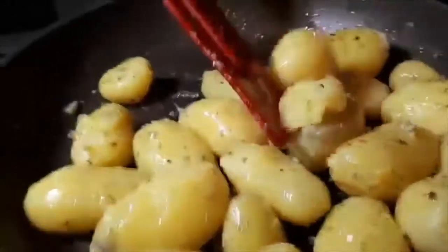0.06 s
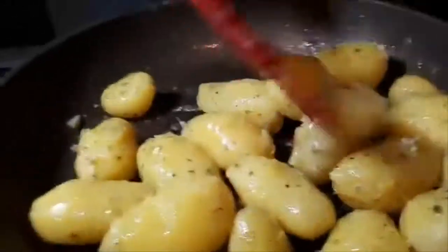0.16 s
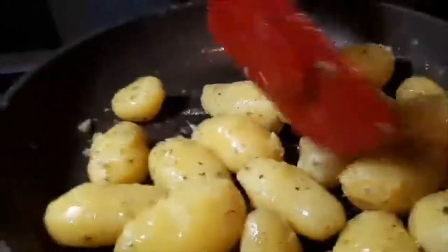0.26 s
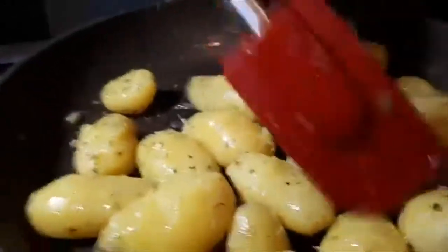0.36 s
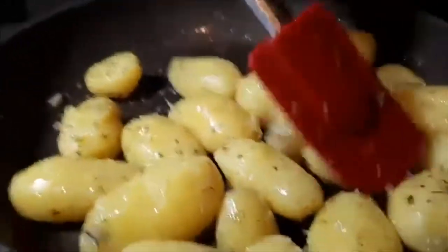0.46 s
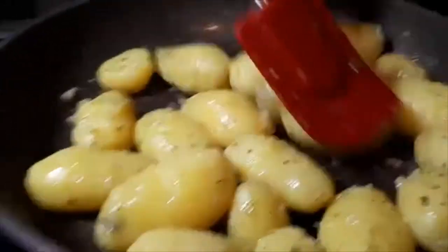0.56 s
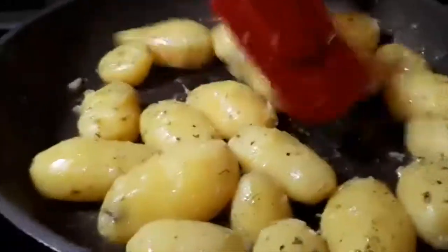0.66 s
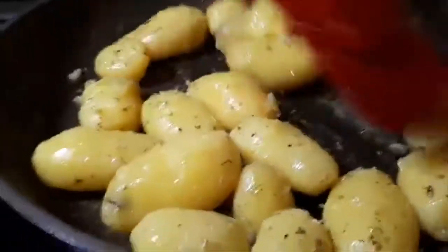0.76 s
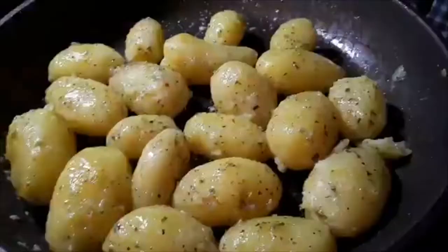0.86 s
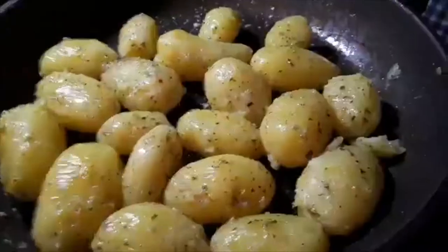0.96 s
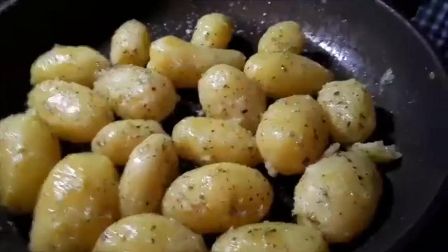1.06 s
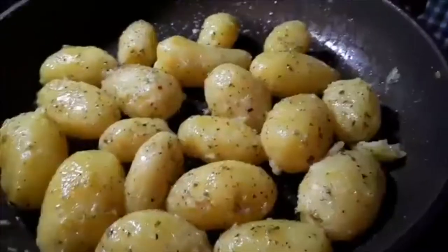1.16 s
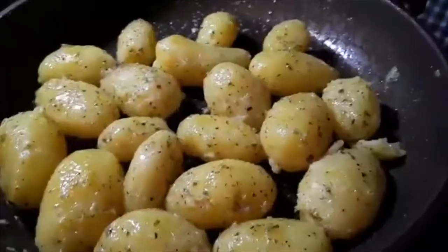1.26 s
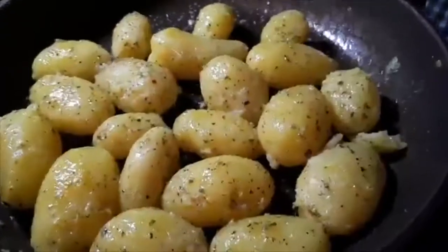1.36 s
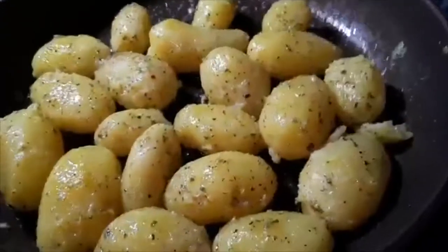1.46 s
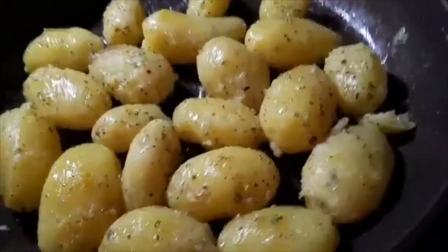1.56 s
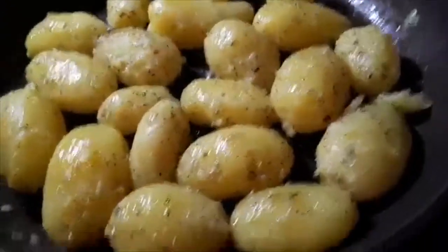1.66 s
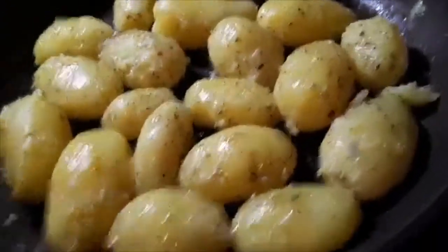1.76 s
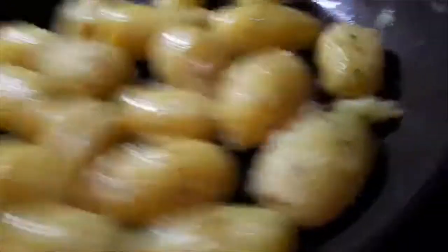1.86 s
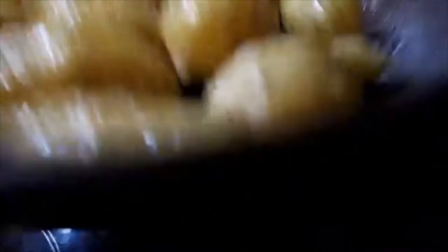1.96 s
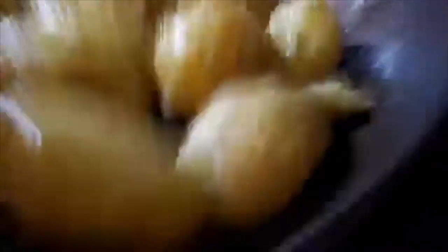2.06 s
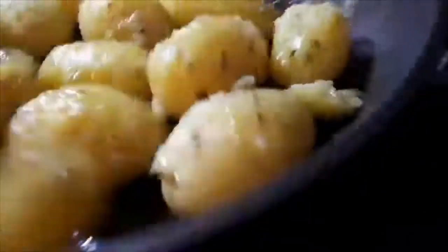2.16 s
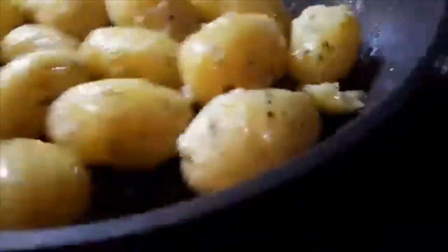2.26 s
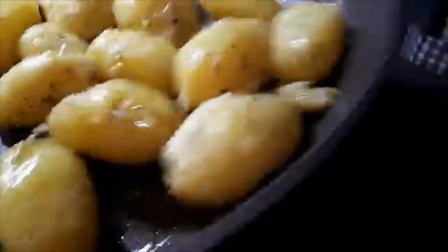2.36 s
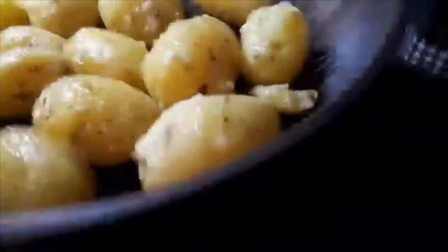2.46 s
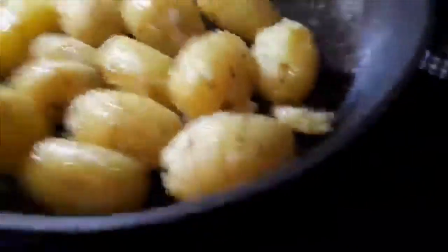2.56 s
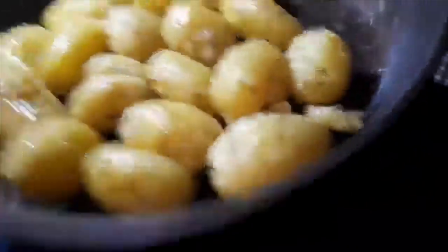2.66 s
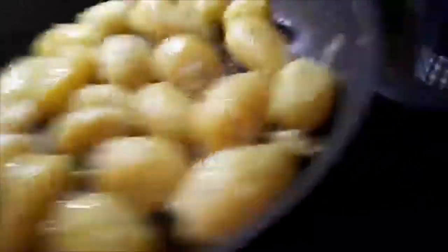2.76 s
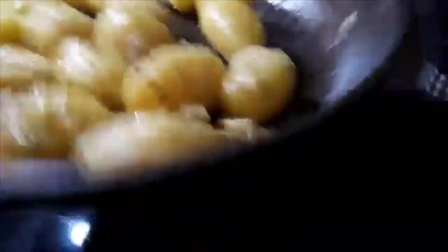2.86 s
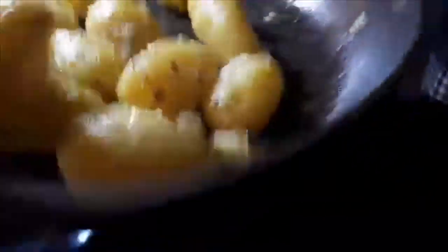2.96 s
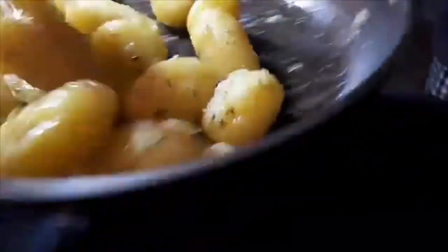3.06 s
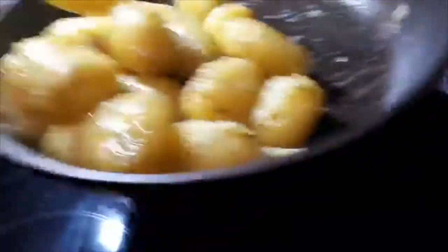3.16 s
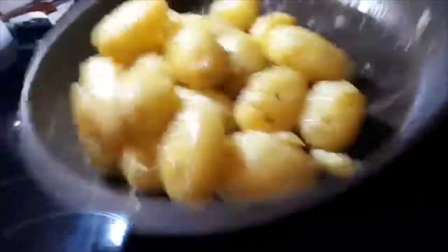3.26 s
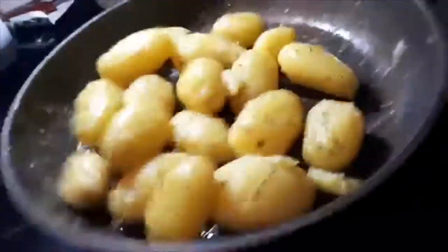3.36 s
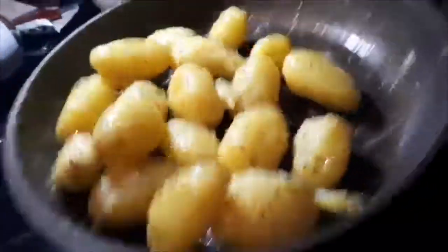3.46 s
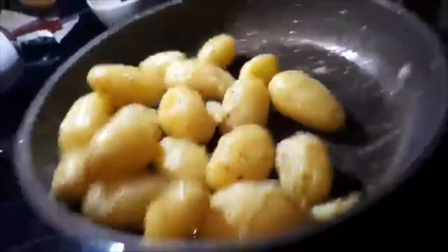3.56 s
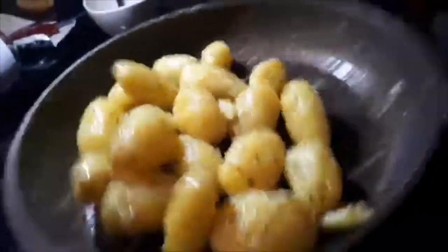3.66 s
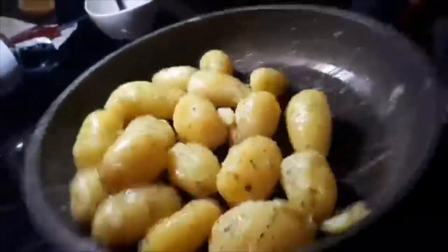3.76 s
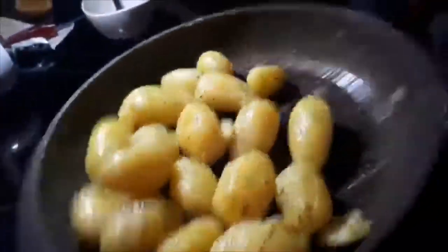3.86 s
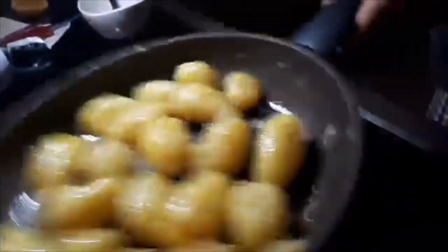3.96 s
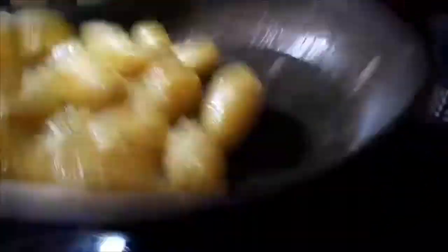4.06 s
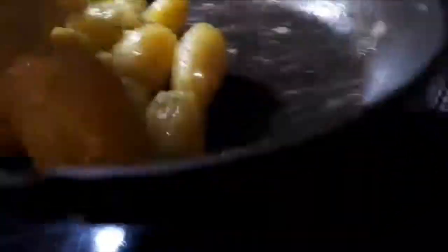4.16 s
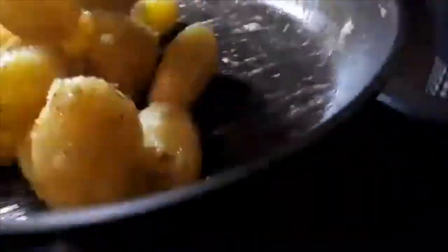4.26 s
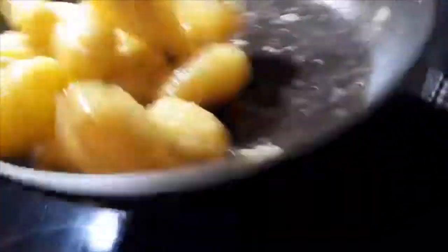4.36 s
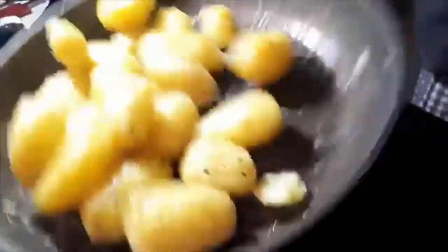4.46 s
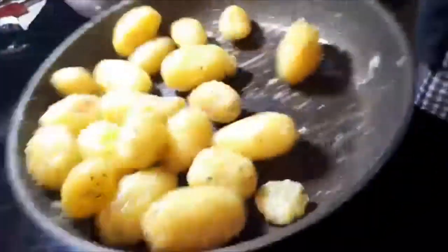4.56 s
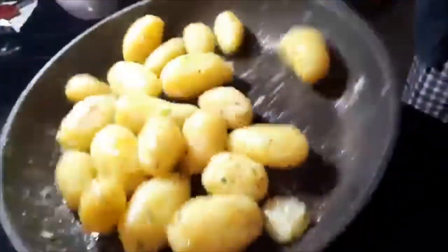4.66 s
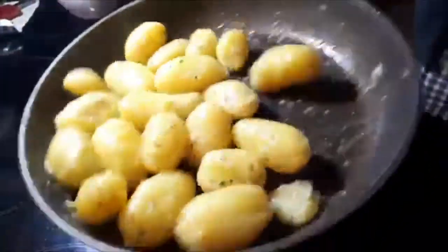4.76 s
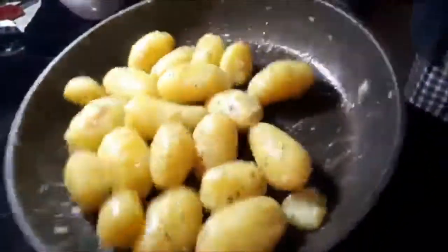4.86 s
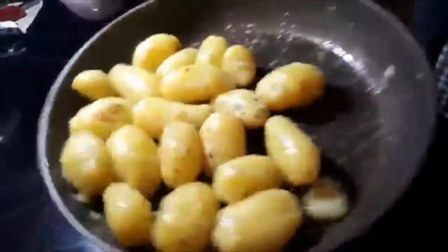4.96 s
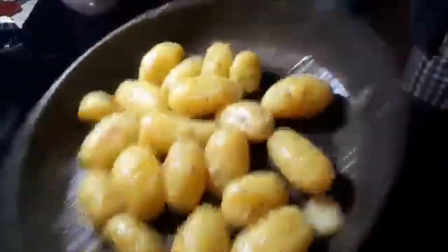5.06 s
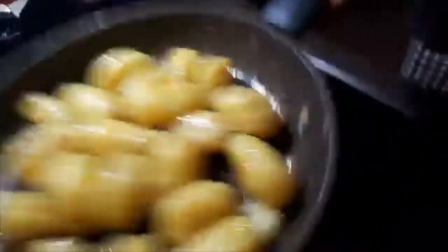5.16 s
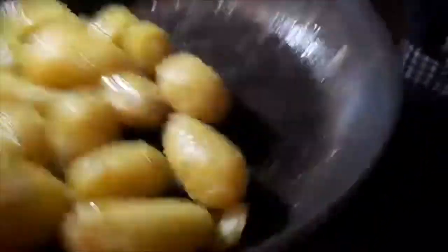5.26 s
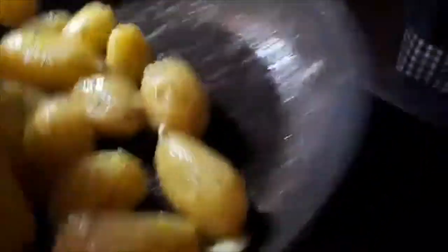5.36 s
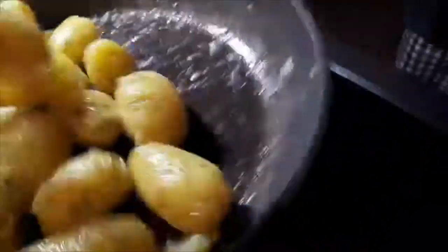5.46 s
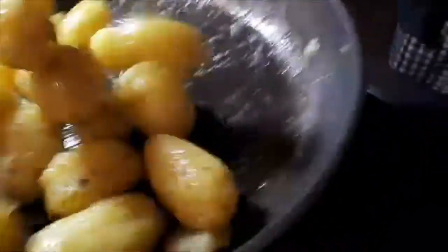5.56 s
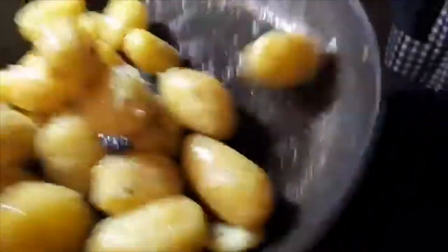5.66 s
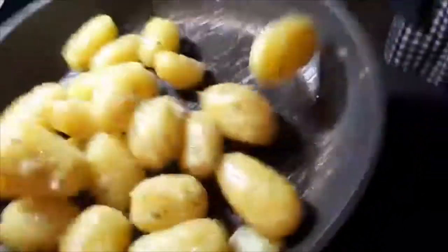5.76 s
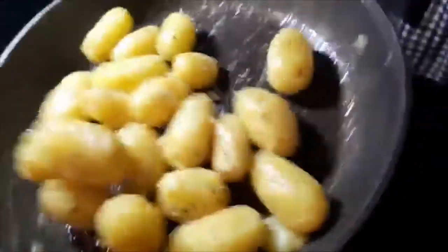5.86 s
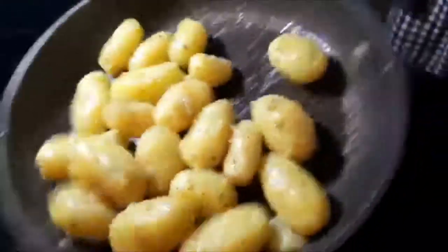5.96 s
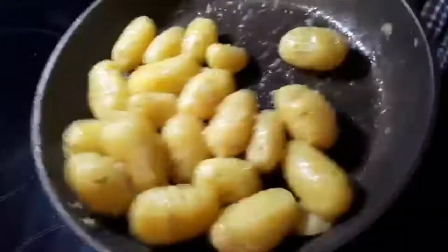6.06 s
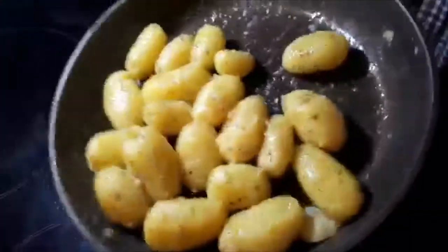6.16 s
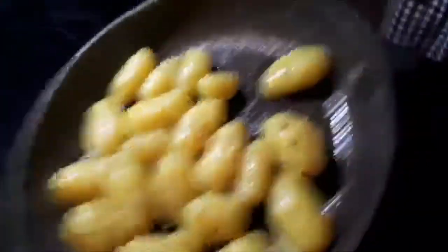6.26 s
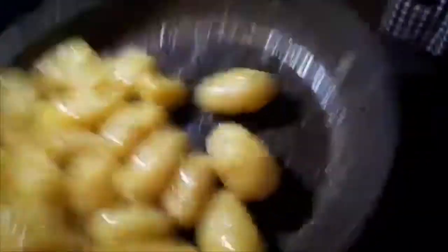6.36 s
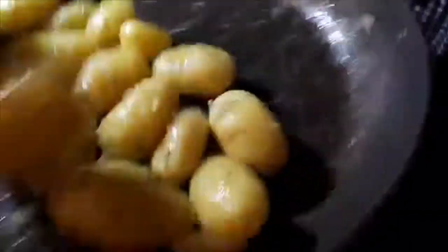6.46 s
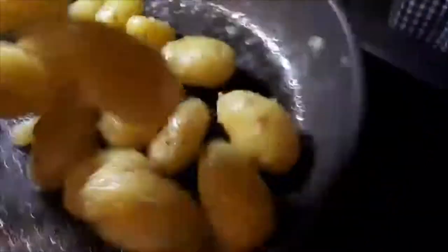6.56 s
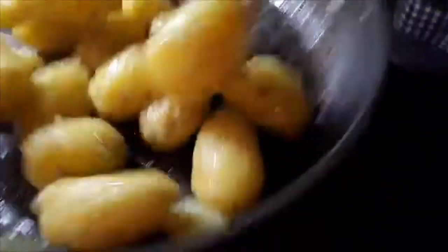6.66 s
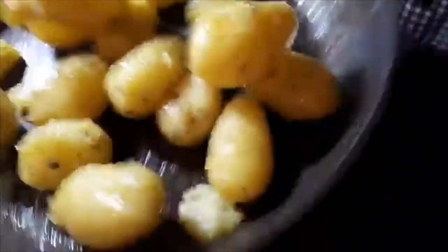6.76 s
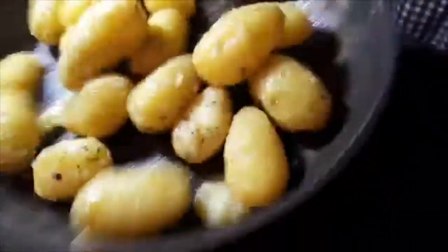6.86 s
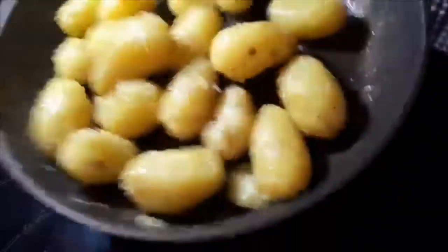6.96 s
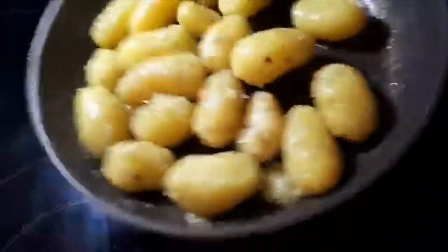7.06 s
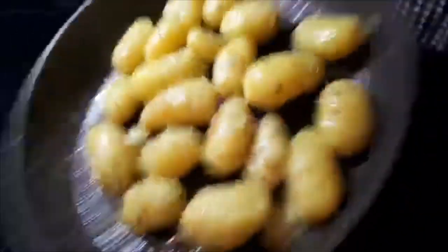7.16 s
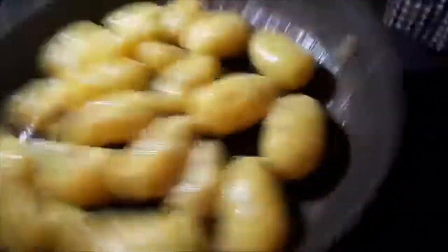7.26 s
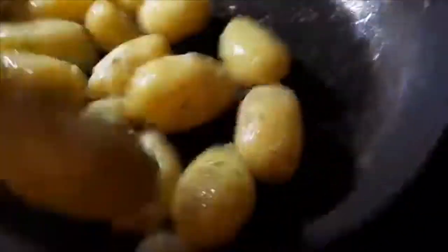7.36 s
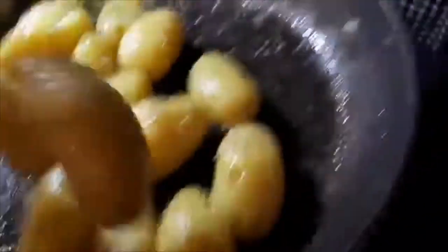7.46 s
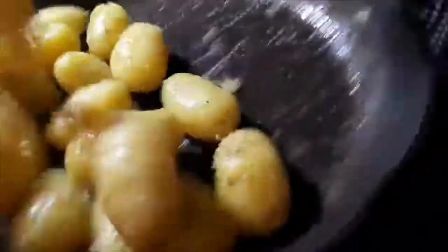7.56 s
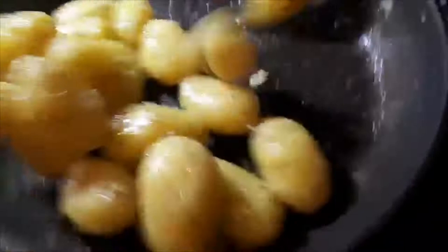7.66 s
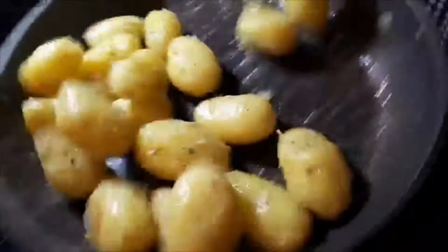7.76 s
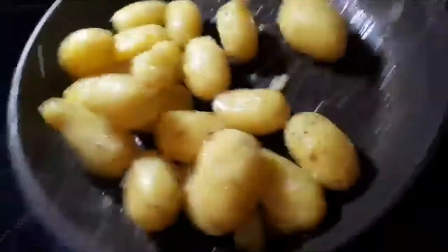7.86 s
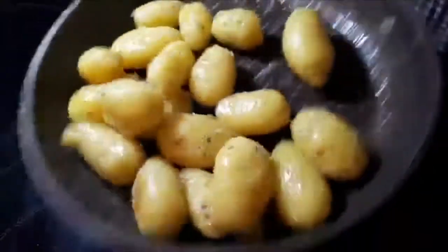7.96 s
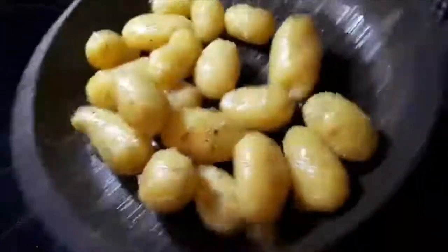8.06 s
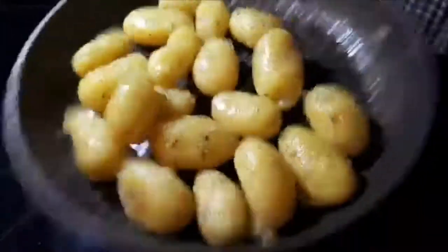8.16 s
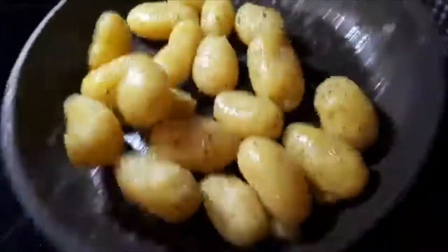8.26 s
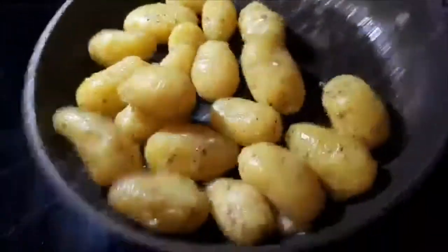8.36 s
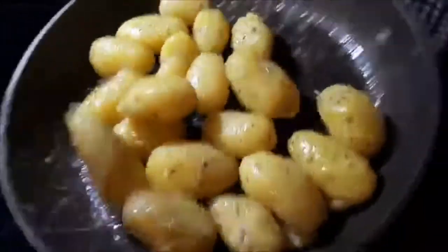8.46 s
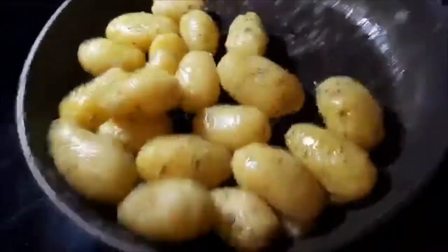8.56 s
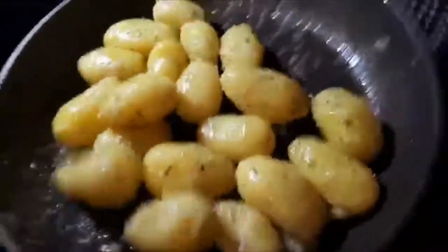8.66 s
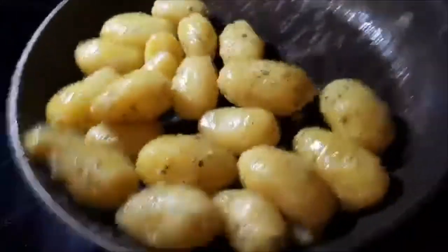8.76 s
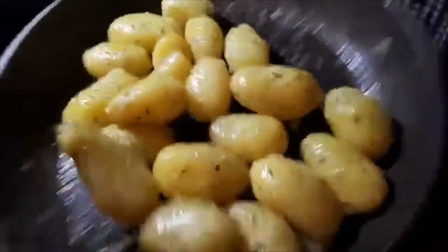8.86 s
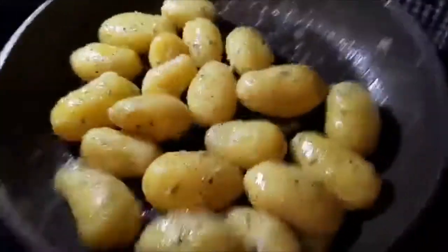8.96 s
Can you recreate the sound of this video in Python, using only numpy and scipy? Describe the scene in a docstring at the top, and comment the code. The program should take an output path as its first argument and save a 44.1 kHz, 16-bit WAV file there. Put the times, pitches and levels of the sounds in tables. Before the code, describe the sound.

Close stereo sound of small potatoes frying in butter in a kitchen. At first there is only a faint sizzle over a low, wavering hob hum; at 0.5 s a spatula nudge gives a soft thud and a little bubbling fizz. At 0.95 s the sizzle abruptly becomes much louder, bright and wet, with a sharp spit; another cracks at 1.3 s, and the hum cuts out near 1.5 s. Around 2.1 to 2.5 s the pan is lifted with a low groaning scrape, dull bump and heavy thud, the sizzle flaring strongly. Metallic clacks and rasping skids follow at 3.3 to 3.5 s, 3.95 s and 7.3 s, with further scrapes at 6.3 and 7.7 s. Between them potatoes roll, slide and thump softly, especially 5.3 to 7.9 s, with hissing surges. Crisp spits crackle throughout; a brief scrape at 8.4 s leads to steadier sizzling.

```python
"""A low hum and a faint sizzle open the scene: small potatoes fry in butter in a pan on a kitchen hob, heard
close by. The sizzle, ringing bubbles over hiss, jumps up abruptly at about 0.95 s; the hum stops about half a
second later. Single loud spits crack out. After a nudge of the spatula the pan is lifted and shaken: the potatoes
slide and thud as dull filtered knocks, while the pan scrapes and knocks as rasping noise and ringing modes."""
import sys
import numpy as np
from scipy import signal
from scipy.fft import rfft, irfft, next_fast_len
from scipy.io import wavfile

SR = 44100
rng = np.random.default_rng(int(sys.argv[2]) if len(sys.argv) > 2 else 0)


def wav_out(sig):
    """Save sig, one row per channel (or a flat mono array), as 16-bit PCM at SR to the path in sys.argv[1]."""
    wavfile.write(sys.argv[1], SR, np.round(np.clip(np.atleast_2d(sig).T, -1, 1) * 32767).astype(np.int16))


N = 396900
T = np.arange(N) / SR
SIZE = next_fast_len(N + SR // 2, real=True)
HZ = np.maximum(np.fft.rfftfreq(SIZE, 1 / SR), 1)


def from_db(db):
    """Amplitude factor of a level in dB."""
    return 10 ** (np.asarray(db) / 20)


def rms_one(x):
    """Scale to an RMS of 1 over all channels."""
    return x / np.sqrt(np.mean(x ** 2) + 1e-20)


def in_time(rows):
    """Columns of a curve at every sample."""
    s, *columns = np.transpose(rows)
    return [np.interp(T, s, c) for c in columns]


def at_hz(points):
    """A spectrum in dB joined on a log-frequency axis."""
    hz, db = np.transpose(points)
    return np.interp(np.log(HZ), np.log(hz), db)


def colour(x, points):
    """Causal (minimum-phase) filter with the given spectrum."""
    cepstrum = irfft(np.log(from_db(at_hz(points))), SIZE)
    # fold the cepstrum onto positive time
    cepstrum[1:SIZE // 2] *= 2
    cepstrum[SIZE // 2 + 1:] = 0
    response = np.exp(rfft(cepstrum))
    return irfft(rfft(x, SIZE) * response, SIZE)[..., :N]


def cut(x, hz, kind, order=2):
    """Butterworth low- or high-pass."""
    sos = signal.butter(order, min(hz, .45 * SR), kind, fs=SR, output="sos")
    return signal.sosfilt(sos, x + 1e-18)


def ring(clicks, hz, t60):
    """A unit click sets off a decaying sine that starts at height 1."""
    r, w = from_db(-60 / (t60 * SR)), 2 * np.pi * hz / SR
    return signal.lfilter([0, np.sin(w)], [1, -2 * r * np.cos(w), r * r], clicks + 1e-18)


def click(s):
    """A unit click at time s."""
    return 1. * (np.arange(N) == round(s * SR))


def swell(s, rise, hold, t60):
    """From time s: a straight rise, a hold and a dying tail."""
    tail_db = -60 * np.clip((T - s - rise - hold) / t60, 0, 3)
    return np.clip((T - s) / rise, 0, 1) * from_db(tail_db)


def drift(rate):
    """Random wandering of RMS 1, through `rate` new values per second."""
    knots = rng.standard_normal(4000)
    return rms_one(np.interp(T * rate, np.arange(len(knots)), knots))


def place(x, left_db, lag_ms=0):
    """A source nearer the left microphone is louder and earlier there."""
    late = np.pad(x, (round(abs(lag_ms) * SR / 1000), 0))[:N]
    return np.array([x * from_db(left_db / 2), late * from_db(-left_db / 2)])


def grains(per_s, spread_db):
    """Random clicks of unequal size; a positive spread gives many small and a few large."""
    chance, out = rng.random(N), np.zeros(N)
    at = np.flatnonzero(chance < per_s / SR)
    rarity = np.minimum(-np.log(chance[at] * SR / per_s + 1e-12), 4.5)
    out[at] = from_db(spread_db * rarity) * (-1.) ** at
    return rms_one(out)


# the frying, low and high parts each, between the flares: (time [s], level [dB])
SIZZLE_LEVEL = [(0, -63.5), (.47, -64.5), (.54, -58.5), (.942, -56.5), (.948, -47), (1.6, -44),
                (2.4, -42.5), (3.3, -44.5), (4.9, -46), (5.7, -44), (7.15, -49.5), (9, -46)]
# a wet face of a potato meets the hot pan: (crest time [s], level [dB], swell time [s])
FLARES = [(.34, -60, .08), (.76, -58, 0.085), (2.0, -40, 0.2), (2.23, -37.5, 0.12), (2.48, -38.5, 0.083),
          (2.921, -41, 0.22), (3.131, -44, 0.023), (4.1, -40.5, 0.18), (5.311, -39, 0.23),
          (6.46, -39.5, 0.091), (6.7, -39.5, 0.18), (6.93, -43.5, 0.28), (7.35, -43, 0.19),
          (7.58, -45.5, 0.063), (7.86, -43.5, 0.49), (8.6, -44.5, 0.089)]
FLARE_T60_S = 0.38


def frying():
    """Strength of the sizzle: the flares add their power to the steady frying."""
    steady = from_db(in_time(SIZZLE_LEVEL)[0])
    flares = sum((from_db(db) * swell(s - rise, rise, 0, FLARE_T60_S)) ** 2 for s, db, rise in FLARES)
    return np.sqrt(steady ** 2 + flares)


# moisture on the pan floor makes larger, lower bubbles: (time [s], lows up and highs down by [dB])
MOISTURE = [(.42, 3), (.55, 8), (1.6, 7.5), (3.0, 4.5), (4.6, 3), (9.0, 0)]
# colour of the frying fat: (frequency [Hz], relative level [dB])
FAT_SPECTRUM = [(300, -32), (1000, -21), (1850, -15), (2150, -3.5), (2800, -.3), (4300, -1.5), (5900, -3.5),
                (7200, -.5), (7950, 0), (8800, -7.5), (11500, -4.5), (15000, -6)]
# how much louder the sizzle is on the left: (frequency [Hz], level difference [dB])
LEFT_LEAN = [(1900, 0), (6400, 8.5), (9800, -1), (15000, 5.5)]


def sizzle(per_s=9000, spread_db=2.0, hiss_db=-1.0, flutter_db=3.0, cycles=18.0, lag_ms=.36, spray_hz=8400,
           spray_db=0.0, spray_loss=0.45, surge_db=1.0, spray_surge_db=1.5, surges_per_s=16, count=28):
    """Bubbles of many sizes burst, each size in its own fits and starts, over a hiss of the tiniest."""
    moisture_db, = in_time(MOISTURE)
    bubbles, shared_fits = 0, drift(22)
    for hz in np.linspace(1500, 15000, count):
        flutter = from_db(flutter_db * (drift(25) + .5 * shared_fits))
        bursts = grains(per_s / count, spread_db) * flutter
        one_size = rms_one(ring(bursts, hz, cycles / hz))
        bubbles = bubbles + place(one_size, 0, lag_ms * (.5 + rng.random()))
    # tiny drops snap with a dry tick across all frequencies
    ticks = from_db(-10) * place(grains(260, spread_db=2.4), 0, lag_ms)
    hiss = from_db(hiss_db) * rng.standard_normal((2, N))
    fat = colour(rms_one(bubbles) + ticks + hiss, FAT_SPECTRUM)
    lean = from_db(at_hz(LEFT_LEAN) * [[.5], [-.5]])
    fat = irfft(rfft(fat, SIZE) * lean, SIZE)[:, :N]
    body, spray = cut(fat, spray_hz, "low", order=8), cut(fat, spray_hz, "high", order=8)
    large, tilt = cut(body, 5500, "low", order=1), from_db(moisture_db)
    body = large * tilt + (body - large) / tilt
    body = rms_one(body / np.hypot(tilt, 1 / tilt))
    # the drier the pan, the more fine spray; both surge a little by chance
    surge = drift(surges_per_s)
    body = from_db(surge_db * surge) * body
    spray_level_db = spray_db - spray_loss * moisture_db + spray_surge_db * surge
    spray = from_db(spray_level_db) * rms_one(spray)
    return frying() * (body + spray)


FIZZ_FROM_S, FIZZ_RISE_S, FIZZ_HOLD_S, FIZZ_T60_S, FIZZ_DB = .48, 0.15, 0.17, 0.51, -58


def fizz(per_s=1800, lowest_hz=2250, highest_hz=3200, cycles=26.0, count=8):
    """Like-sized bubbles swell on the wet side of the potato turned by the spatula, and dry away."""
    bubbles = 0
    for hz in np.geomspace(lowest_hz, highest_hz, count):
        one_size = ring(grains(per_s / count, spread_db=1.0), hz, cycles / hz)
        bubbles = bubbles + place(one_size, 0, lag_ms=0.52 * rng.random())
    bubbles = rms_one(cut(bubbles, 1.07 * lowest_hz, "high", order=6))
    return from_db(FIZZ_DB) * swell(FIZZ_FROM_S, FIZZ_RISE_S, FIZZ_HOLD_S, FIZZ_T60_S) * bubbles


# lesser spits come at random once the pan is moved
SMALL_SPITS_FROM_S, SMALL_SPIT_DB, SMALL_SPIT_SPREAD_DB, SMALL_PLOP_DB = 1.8, -36.5, 1.5, -25


def small_spits(count=60):
    """Rows like those of the loud spits, drawn by chance."""
    times = rng.uniform(SMALL_SPITS_FROM_S, T[-SR // 10], count)
    levels_db = SMALL_SPIT_DB + SMALL_SPIT_SPREAD_DB * rng.standard_normal(count)
    return [(s, db, SMALL_PLOP_DB) for s, db in zip(times, levels_db)]


# the loudest spits of fat: (time [s], level before filtering [dB], low plop relative to it [dB])
LOUD_SPITS = [(0.9697, -23, -14), (1.2811, -22.5, 6), (1.9075, -22, -28), (2.253, -20.5, -23),
              (2.396, -29, -21), (2.985, -31, 13), (3.8192, -29.5, 7), (4.346, -25.5, -37),
              (4.5264, -25, -23), (5.0833, -22, -2), (5.527, -23.5, -9), (5.6143, -29.5, -18),
              (5.8889, -22.5, -24), (5.9833, -28.5, -18), (6.067, -26.5, -7), (6.557, -32, -1),
              (6.7655, -19.5, -34), (7.3564, -20, -15), (7.552, -24.5, -7), (8.262, -27, -6),
              (8.4123, -28, -31), (8.82, -22, -5)]
# colour of a spit: (frequency [Hz], relative level [dB])
SPIT_SPECTRUM = [(500, -13), (2000, -6), (4500, 0), (7500, 2), (9500, -1), (15000, 1)]


def spits(spatter_t60=0.055, plop_hz=2500, plop_t60=0.0027, spatter_db=-9.5, crack_t60=0.0019,
          crack_gain_db=4.5):
    """A large drop bursts: a crack of about a millisecond, a faint spatter, and the plop of its cavity."""
    cracks, plops, t = np.zeros(N), np.zeros(N), T[:SR // 25]
    crack_decay = from_db(crack_gain_db - 60 * t / crack_t60)
    spatter_decay = from_db(spatter_db - 60 * t / spatter_t60)
    for s, level_db, plop_db in LOUD_SPITS + small_spits():
        at = round(s * SR)
        crack = rng.choice([-1, 1], len(t)) * crack_decay
        spatter = rng.standard_normal(len(t)) * spatter_decay
        cracks[at:at + len(t)] += from_db(level_db) * (crack + spatter)
        plops[at] = from_db(level_db + plop_db)
    plops = cut(ring(plops, plop_hz, plop_t60), plop_hz / 2, "high")
    return place(colour(cracks, SPIT_SPECTRUM) + plops, left_db=9.0, lag_ms=.35)


# the pan is tipped or shaken: (time [s], length [s], sliding level [dB], rumble level [dB])
SHAKES = [(2.063, 0.095, -54.5, -51), (2.362, .2, -59.5, -67), (3.006, 0.039, -64, -61),
          (4.187, 0.29, -73, -59), (4.992, 0.32, -68, -60.5), (5.349, 0.12, -50.5, -56.5),
          (5.722, 0.089, -58, -55.5), (6.213, 0.068, -74, -57), (6.484, 0.069, -57.5, -52),
          (6.7, 0.11, -75, -55.5), (7.433, 0.22, -61.5, -53.5), (8.534, 0.059, -52, -63.5)]
SHAKE_RISE_S, SETTLE_T60_S, ROLL_DELAY_S = 0.018, 0.68, 0.12


def tumbling():
    """Strengths of rolling and wet sliding: each shake rises, holds and settles; rolling starts later."""
    roll_power, slide_power = 0, 0
    for s, length, slide_db, roll_db in SHAKES:
        hold = length - SHAKE_RISE_S
        roll = from_db(roll_db) * swell(s + ROLL_DELAY_S, SHAKE_RISE_S, hold, SETTLE_T60_S)
        slide = from_db(slide_db) * swell(s, SHAKE_RISE_S, hold, SETTLE_T60_S)
        roll_power = roll_power + roll ** 2
        slide_power = slide_power + slide ** 2
    return np.sqrt(roll_power), np.sqrt(slide_power)


# dull thuds: first the nudge of the spatula, then potatoes dropping on the pan floor:
# (time [s], level before the mix [dB], slap relative to it [dB])
THUDS = [(0.493, -34, -20), (2.258, -24.5, -12), (3.171, -36, -28), (4.035, -39, 14), (5.549, -30.5, -3),
         (5.626, -31.5, -17), (5.655, -37, 1), (5.88, -36.5, 1), (6.682, -33, -7), (6.764, -33.5, -2),
         (6.877, -44, 6), (7.55, -35.5, -20.5), (7.606, -31, -18), (7.718, -28, 6), (7.855, -36, 2),
         (7.922, -38, 0), (8.408, -37.5, 3), (8.822, -39.5, -3)]
THUD_HZ, THUD_SPREAD_OCTAVES = 140, 0.14
# colour of rolling potatoes: (frequency [Hz], relative level [dB])
RUMBLE_SPECTRUM = [(25, -43), (55, -14), (95, 1), (140, -1), (330, -17.5), (700, -19.5), (1500, -45)]
# colour of wet sliding, shared by the simmer: (frequency [Hz], relative level [dB])
SLIDE_SPECTRUM = [(200, -15), (650, -5), (950, 0), (1700, 0), (2300, -5), (4000, -25)]


def potatoes(knocks_per_s=45, thud_t60=0.06, slap_hz=225, slap_t60=0.019):
    """Soft bodies are nudged, roll with dull bumps, slide on the wet fat, and drop with a thud and a slap."""
    roll, slide = tumbling()
    knocks = grains(knocks_per_s, spread_db=-0.5) + 0.43 * rng.standard_normal(N)
    rolling = rms_one(colour(knocks, RUMBLE_SPECTRUM)) * roll
    smacks = place(grains(900, spread_db=3.0), left_db=8.0, lag_ms=.35)
    sliding = rms_one(colour(smacks + 0.9 * rng.standard_normal((2, N)), SLIDE_SPECTRUM)) * slide
    thuds = 0
    for s, db, slap_db in THUDS:
        blow = click(s) * from_db(db)
        hz = THUD_HZ * 2 ** (THUD_SPREAD_OCTAVES * rng.standard_normal())
        thuds = thuds + ring(blow, hz, thud_t60) + from_db(slap_db) * ring(blow, slap_hz, slap_t60)
    soft = cut(cut(thuds, 80, "high", order=3), 600, "low")
    return place(rolling + 0.72 * soft, left_db=12.0) + sliding


# pan meeting the hob: (time [s], ring level before gain [dB], favoured pitch [Hz], rasp level [dB],
# rise [s], fade to -60 dB [s], rasp bottom [Hz], rasp top [Hz])
CONTACTS = [(3.305, -43, 760, -37.5, 0.009, 0.48, 190, 1020),
            (3.489, -72, 900, -27.5, 0.054, 0.54, 135, 15100),
            (3.938, -35, 790, -36, 0.015, 0.65, 149, 2850), (4.006, -53, 1100, -32.5, 0.018, .5, 90, 4200),
            (6.277, -51, 600, -31.5, 0.0104, 0.57, 121, 4840),
            (7.291, -36, 780, -38.5, 0.0041, 0.6, 252, 4400),
            (7.351, -38.5, 714, -42.5, 0.00775, 0.5, 89.5, 960),
            (7.705, -36, 480, -32, 0.0054, 0.77, 90, 2100), (8.41, -56, 700, -53.5, 0.0011, 0.66, 80, 870)]
# modes of the pan: (frequency [Hz], relative level [dB], decay to -60 dB [s])
PAN_MODES = [(356, -14, .3), (436, -12, .25), (539, -8, .55), (635, -8, .18), (757, -1, .15),
             (786, -3, .48), (942, -3.5, .11), (1095, -4, .16), (1255, -7, .1), (1400, -11, .18),
             (1595, -13, .18), (1875, -9, .25), (1975, -9, .15)]
# colour of the skidding base: (frequency [Hz], relative level [dB])
RASP_SPECTRUM = [(50, -7), (160, 3.5), (330, -5.5), (700, 0), (1500, -0.5), (2600, 2), (6000, 2),
                 (7700, 6.5), (9000, -4), (12000, 3), (15000, -12)]
FAVOUR_DB_PER_OCTAVE = 8.5


def pan_on_hob(chatter_per_s=1500, ring_gain_db=-7.5, strike=38.0):
    """The base lands and skids: its chatter is heard as a rasp and sets the modes of the pan ringing."""
    chatter = place(grains(chatter_per_s, spread_db=2.0), 0, lag_ms=0.21)
    chatter = rms_one(chatter + 0.99 * rng.standard_normal((2, N)))
    rough, out = colour(chatter, RASP_SPECTRUM), 0
    impulse = signal.unit_impulse(SR)
    modes = np.array([from_db(db) * ring(impulse, hz, t60) for hz, db, t60 in PAN_MODES])
    for s, ring_db, favoured_hz, rasp_db, rise, fade, bottom_hz, top_hz in CONTACTS:
        pressure = swell(s, rise, 0, fade)
        band = cut(cut(rough, top_hz, "low", order=4), bottom_hz, "high")
        rasp = from_db(rasp_db) * pressure * rms_one(band)
        # every contact point favours the modes near one pitch
        octaves_off = np.abs(np.log2(np.array(PAN_MODES)[:, 0] / favoured_hz))
        weights = from_db(-FAVOUR_DB_PER_OCTAVE * octaves_off) * rng.choice([-1, 1], len(PAN_MODES))
        body = weights @ modes
        body = body / np.linalg.norm(body)
        force = pressure ** 2 * chatter + strike * click(s + rise / 2)
        ringing = signal.oaconvolve(force, [body], axes=1)[:, :N]
        out = out + rasp + 2 * from_db(ring_db + ring_gain_db) * ringing
    return out * from_db([[1], [-1]])  # a little louder on the left


# the edge of the base strikes the hob: (time [s], level [dB], pitch [Hz])
CLACKS = [(3.3205, -36, 750), (3.9495, -31.5, 830), (3.962, -25, 810), (7.2945, -27.5, 800)]


def clacks(cycles=24.0):
    """Hard clacks: the edge rings, falling by 60 dB in 24 cycles as the hob damps it."""
    return sum(from_db(db) * ring(click(s), hz, cycles / hz) for s, db, hz in CLACKS)


# the pan is dragged over the hob: (time [s], rise [s], hold [s], rasp level [dB], rasp top [Hz],
# groan level [dB], groan start pitch [Hz], groan end pitch [Hz])
DRAGS = [(1.135, .008, 0.17, -53, 1840, -64, 380, 423), (2.06, 0.084, 0.065, -56.5, 880, -49, 288, 140),
         (8.425, 0.026, 0.12, -65, 850, -55, 320, 163), (8.91, 0.017, 0.049, -55.5, 1220, -68, 450, 380)]
DRAG_T60_S = 0.37


def drags(slips_per_s=700, groan_width_hz=150, bottom_hz=250):
    """The base sticks and slips: a steady rasp, and a low resonance that glides as the load shifts."""
    slips, out = place(grains(slips_per_s, spread_db=0.5), 0, lag_ms=0.11), 0
    slips = slips + 0.98 * rng.standard_normal((2, N))
    for s, rise, hold, rasp_db, top_hz, groan_db, start_hz, end_hz in DRAGS:
        rasp = rms_one(cut(cut(slips, top_hz, "low", order=4), bottom_hz, "high"))
        # a narrow band-pass follows the glide: shift down to 0 Hz, low-pass, shift back up
        glide_hz = np.interp(T, [s, s + rise + hold], [start_hz, end_hz])
        turn = np.exp(2j * np.pi * np.cumsum(glide_hz) / SR)
        groan = rms_one((cut(slips[0] / turn, groan_width_hz / 2, "low") * turn).real)
        both = from_db(rasp_db) * rasp + from_db(groan_db) * place(groan, left_db=4.0)
        out = out + swell(s, rise, hold, DRAG_T60_S) * both
    return out


# the handle bumps as the pan is lifted and tipped: (time [s], relative level [dB])
BUMPS = [(2.2077, 0), (5.751, -10.5)]
# modes of the handle: (frequency [Hz], level [dB], decay to -60 dB [s])
HANDLE_MODES = [(164, -21.5, 0.024), (288, -22.5, 0.02), (422, -33.5, 0.03), (362, -47.5, 0.46),
                (1035, -41, 0.099), (2100, -40.5, 0.08)]


def handle():
    """Dull bumps set the modes of the handle ringing briefly."""
    blows = cut(sum(from_db(db) * click(s) for s, db in BUMPS), 3000, "low")
    ringing = sum(from_db(db) * ring(blows, hz, t60) for hz, db, t60 in HANDLE_MODES)
    return place(cut(ringing, 70, "high"), left_db=9.0)


# level at a given sizzle, how steeply it follows the sizzle, and how fast it dries off
SIMMER_DB, SIMMER_AT_SIZZLE_DB, SIMMER_FOLLOWS, DRYING_DB_PER_S = -57, -45.5, 1.13, 0.72


def simmer(per_s=500, spread_db=4.0, hiss_db=0.0, lowest_hz=750):
    """Water bubbles out under the potatoes, lower in pitch than the fat."""
    bubbles = place(grains(per_s, spread_db), left_db=11.5, lag_ms=0.39)
    bubbles = bubbles + from_db(hiss_db) * rng.standard_normal((2, N))
    follow = (frying() / from_db(SIMMER_AT_SIZZLE_DB)) ** SIMMER_FOLLOWS
    strength = follow * from_db(SIMMER_DB - DRYING_DB_PER_S * T)
    return strength * rms_one(cut(colour(bubbles, SLIDE_SPECTRUM), lowest_hz, "high"))


# colour of the room air: (frequency [Hz], relative level [dB])
KITCHEN_SPECTRUM = [(25, -17.5), (95, 3), (160, -4), (300, -12), (550, -18), (4000, -41)]
HUM_HZ, HUM_DB, HUM_OFF_S = 95.7, -62, 1.46


def background(floor_db=-66, waver_db=3.5):
    """The hob hums on a wavering low tone until it cuts out; the kitchen murmurs with low air noise."""
    tone = np.sin(2 * np.pi * HUM_HZ * T + .5 * drift(15.0))
    fade_out = np.clip((HUM_OFF_S - T) / 0.042, 0, 1)
    hum = tone * from_db(HUM_DB + waver_db * drift(23.0)) * fade_out
    air = colour(rng.standard_normal(N) + 0.49 * rng.standard_normal((2, N)), KITCHEN_SPECTRUM)
    return place(hum, left_db=3.0) + from_db(floor_db) * rms_one(air)


ROOM_T60_S = 0.11


def room(x, wet_db):
    """Dense reflections off hob, tiles and walls, different on each side."""
    t = T[:SR // 2]
    tail = rng.standard_normal((2, len(t))) * from_db(-60 * t / ROOM_T60_S) * (t > .002)
    tail /= np.sqrt(np.sum(tail ** 2, axis=1, keepdims=True))
    return x + from_db(wet_db) * signal.fftconvolve(x, tail, axes=1)[:, :N]


def scene():
    """Mix the frying with the spits, potatoes and pan, each in its share of room."""
    frying_sounds = sizzle() + fizz() + simmer()
    spitting = room(spits(), wet_db=-11.0)
    tossing = room(potatoes() + handle(), wet_db=-4.0)
    scraping = room(pan_on_hob() + clacks() + drags(), wet_db=-3.0)
    return frying_sounds + spitting + tossing + scraping + background()


CUTOFF_HZ = 15150


def record(dry):
    """The small microphones lose the deep bass; the top is cut steeply."""
    steep = signal.ellip(12, .1, 80, CUTOFF_HZ, fs=SR, output="sos")
    return signal.sosfilt(steep, cut(dry, 45, "high"))


dry = scene()
out = record(dry)
wav_out(out)
```